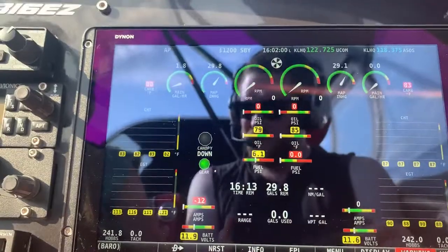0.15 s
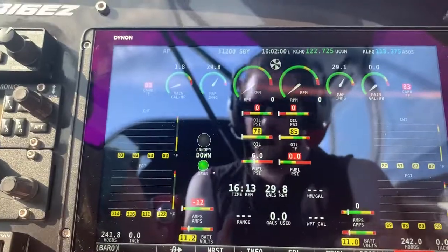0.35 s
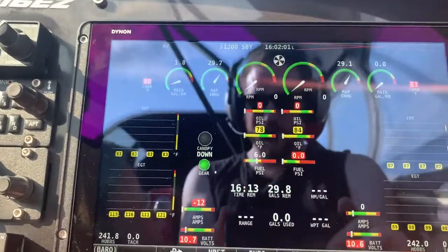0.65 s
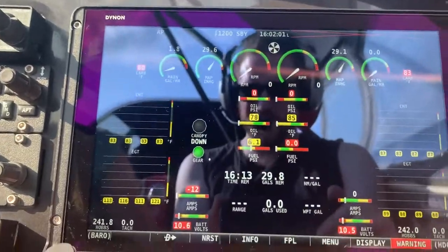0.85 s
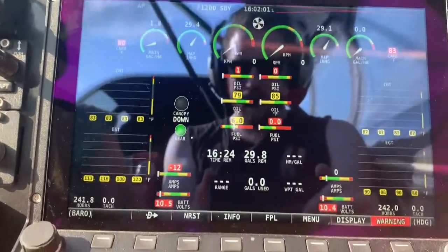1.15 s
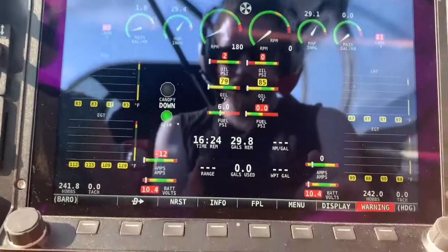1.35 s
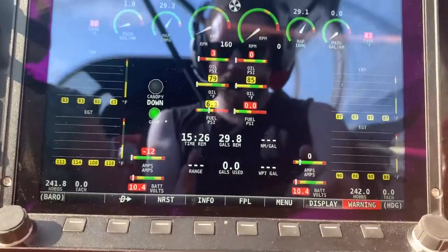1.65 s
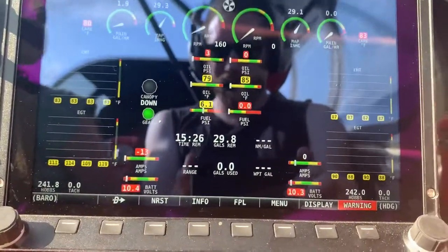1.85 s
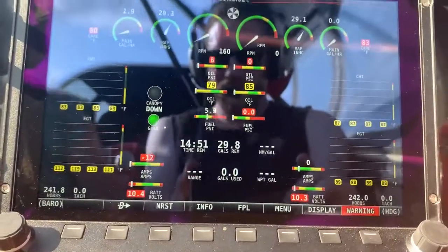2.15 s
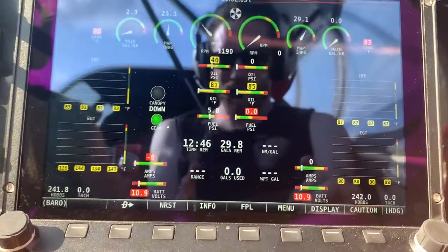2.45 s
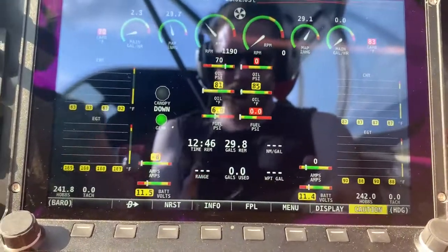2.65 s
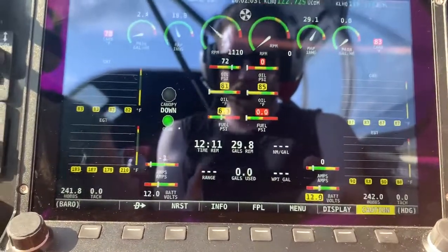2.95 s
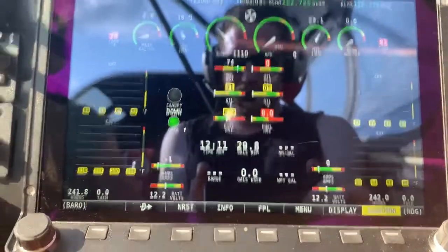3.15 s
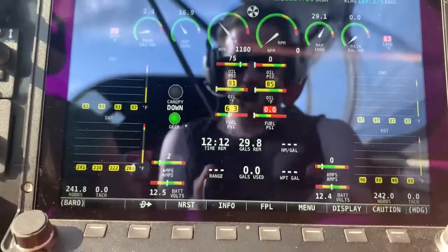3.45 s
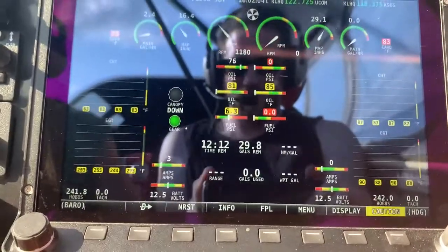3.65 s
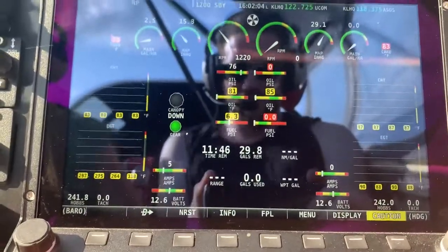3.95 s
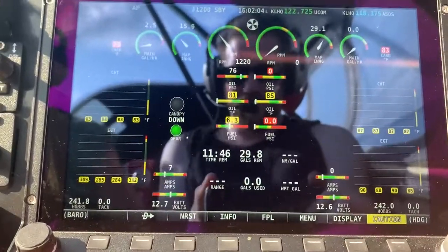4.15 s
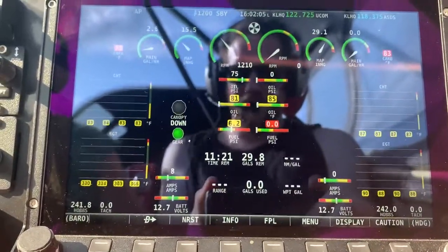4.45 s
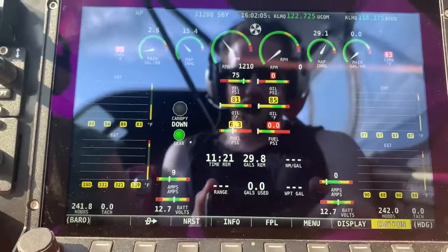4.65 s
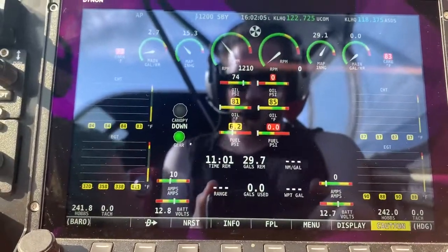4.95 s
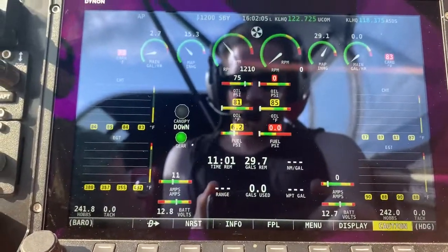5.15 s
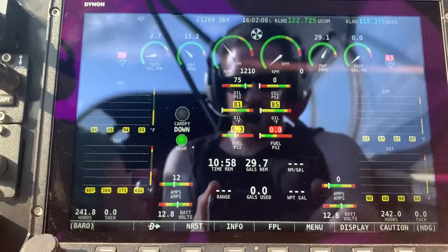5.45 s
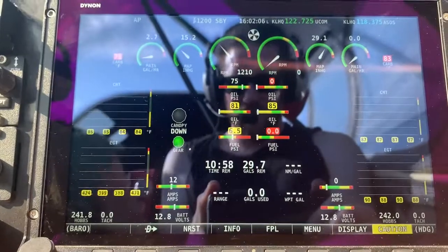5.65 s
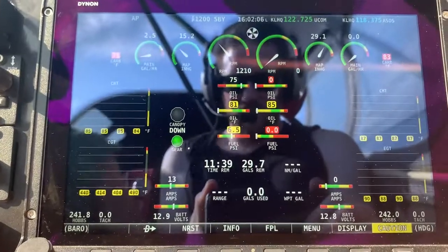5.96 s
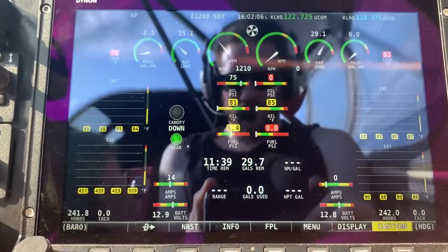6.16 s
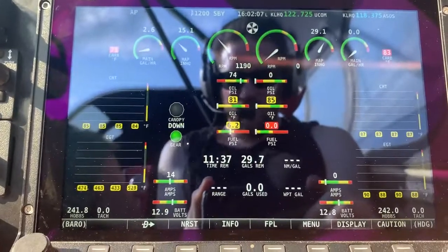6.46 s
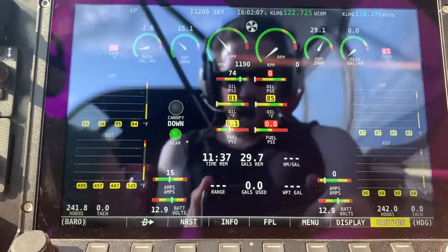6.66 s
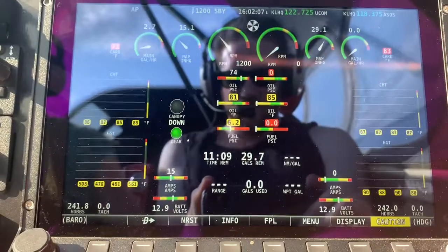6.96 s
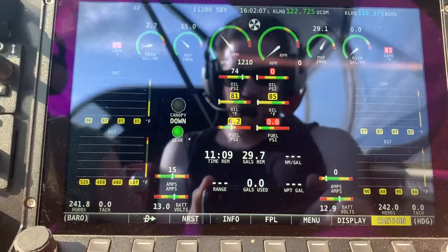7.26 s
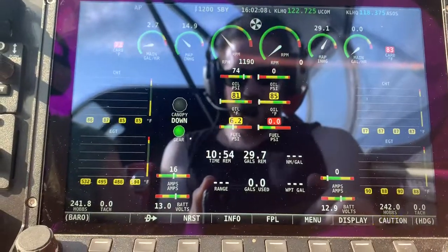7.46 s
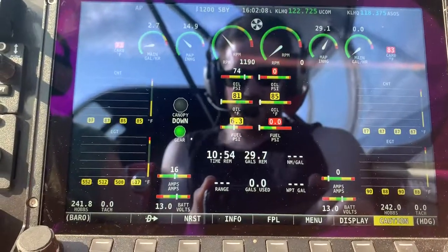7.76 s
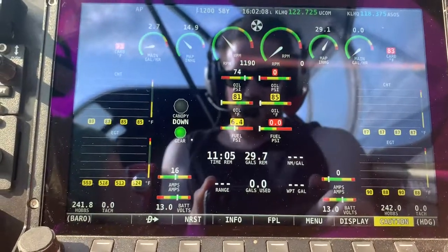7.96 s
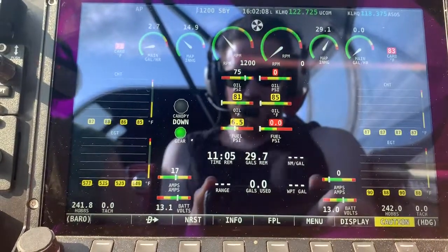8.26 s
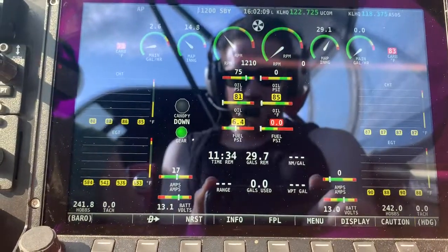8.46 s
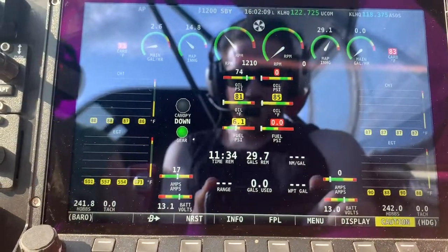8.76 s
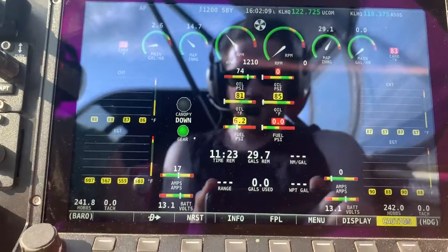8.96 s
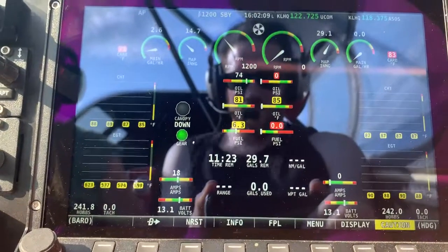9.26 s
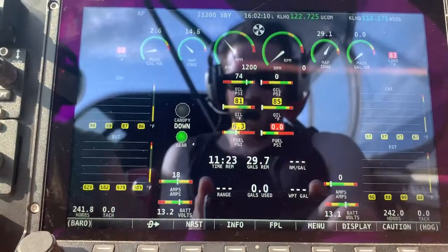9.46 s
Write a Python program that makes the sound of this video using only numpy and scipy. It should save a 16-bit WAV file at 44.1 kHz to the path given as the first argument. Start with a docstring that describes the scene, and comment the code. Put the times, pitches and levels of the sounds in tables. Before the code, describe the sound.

Close handheld stereo capture under a small plane's canopy: a pinion chirps, then eight rhythmic, low grinding heaves follow at about five per second. A sudden burst of barking exhaust and roaring air marks the start, loudest at first. It eases to a continuous throbbing idle, a deep drone under turbulent wash, with faint mechanical hiss, cowling knocks and random canopy thuds until the end.

```python
"""Cockpit of a light aircraft, a phone's two microphone ports inside under the canopy.
Eight compression strokes load the starter: airframe, mounts and panels ring, gears grind, the pinion whines.
The engine catches with rich barks and idles: a drone locked to the shaft, noise throbbing with its turns.
Propeller wash is gusty noise; heavy firings, slaps on the canopy, knocks and loose parts are single blows."""
import sys
import numpy as np
from scipy import signal
from scipy.fft import irfft, next_fast_len
from scipy.io import wavfile
from scipy.ndimage import uniform_filter1d

SR = 44100
rng = np.random.default_rng(int(sys.argv[2]) if len(sys.argv) > 2 else 0)


def master(y):
    """Save y as 16-bit WAV."""
    cut = np.clip(np.atleast_2d(y).T, -1, 1)
    pcm = np.round(cut * 32767)  # scale
    wavfile.write(sys.argv[1], SR, pcm.astype(np.int16))


N = 423801

# canopy buffet spectrum: (frequency [Hz], relative level per Hz [dB])
BUFFET_SPECTRUM = [(15, -29), (19, -18), (31, -3), (48, 7.5), (65, 3.5), (86, 3.5), (145, -7.5),
                   (260, -11.5), (340, -51), (570, -120)]
# propeller wash roar spectrum: (frequency [Hz], relative level per Hz [dB])
ROAR_SPECTRUM = [(59, -35), (100, -1), (273, -13.5), (426, -10.5), (469, -9), (605, -5), (780, -13.5),
                 (960, -8), (1140, -9.5), (1520, -15.5), (4500, -35), (5850, -65)]
# valve gear hiss spectrum: (frequency [Hz], relative level per Hz [dB])
HISS_SPECTRUM = [(2000, 11.5), (3500, 3.5), (4700, 4), (6500, 2), (9000, 3.5), (11500, -2.5), (14000, -2),
                 (16000, -22)]
# air puffed by each firing: (frequency [Hz], relative level per Hz [dB])
PUFF_SPECTRUM = [(500, -3), (1000, 9.5), (2200, 1), (4500, -6), (7000, -45), (14000, -47)]
# noise of the running engine: (time [s], buffet [dB], wash roar [dB], hiss [dB])
RUNNING_LEVELS = [(1.55, -19, -43, -68), (1.62, -16, -27, -38), (1.742, -15.5, -17, -26.5),
                  (2.075, -16, -15, -27.5), (2.125, -17, -36, -33), (2.17, -16, -17, -33.5),
                  (2.245, -17, -20, -40), (2.28, -13.5, -28, -49), (2.4, -23, -29, -41.5),
                  (2.47, -16.5, -22, -36.5), (2.68, -16.5, -25, -38), (3.3, -18.5, -21, -36),
                  (3.75, -18.5, -23, -36.5), (4.7, -16.5, -21, -36.5), (6.5, -18.5, -22, -36.5),
                  (8.7, -17, -21, -36.5), (9.61, -18, -22.5, -37.5)]
# cowling modes: (frequency [Hz], width [Hz], relative level [dB])
COWLING_MODES = [(148, 135, 1.5), (264, 250, -5), (411.5, 85, -2), (628.6, 62, -6), (922, 170, -10),
                 (1270, 1600, -11)]
# loud single blows, relative levels: heavy firings while the engine catches, then slaps on the canopy:
# (time [s], crack [dB], thump [dB], tick [dB])
LOUD_BLOWS = [(1.762, -18, -30, -24), (1.812, -16, -14, -37), (1.881, -30, -10, -36),
              (1.937, -35, -30, -34), (2.045, -23, -25, -42), (2.149, -26, -12, -43), (2.176, -27, -9, -35),
              (2.081, -28, -14, -47), (2.237, -18.5, -9.5, -34), (2.279, -24.5, -24, -38),
              (2.307, -26, -19.5, -42), (2.631, -33, -15, -48), (2.793, -30, -17.5, -47),
              (2.823, -20.5, -15.5, -48), (2.984, -30, -32, -41), (3.251, -23, -13.5, -23.5),
              (3.436, -23, -8, -41), (3.585, -30, -19, -40), (3.78, -25, -18, -40), (4.04, -21.5, -12, -41),
              (4.141, -18, -25, -48), (4.356, -20.5, -20, -34), (4.441, -22, -16, -35),
              (4.542, -22, -15, -32), (4.611, -29, -6.5, -33), (4.641, -18.5, -15, -30),
              (4.772, -20, -22, -38), (4.834, -21, -10.5, -44), (4.893, -21, -11, -48),
              (5.039, -37, -26, -50), (5.317, -42, -18, -34), (5.354, -26, -16, -44),
              (5.441, -17.5, -11.5, -27.5), (5.567, -21, -16.5, -46), (5.641, -26, -18, -46),
              (5.7475, -24, -17, -27.5), (6.006, -29, -9, -42), (6.091, -16.5, -17, -28.5),
              (6.237, -30, -15.5, -38), (6.287, -25, -20, -42), (6.389, -33, -13.5, -38),
              (6.518, -17, -8, -25), (6.6826, -22, -11, -33), (6.945, -22, -17, -30),
              (7.0726, -25, -9, -45), (7.445, -36, -14.5, -50), (7.491, -25, -22, -33),
              (7.6396, -23.5, -32, -36), (7.914, -21.5, -14, -32), (7.994, -24, -34, -36),
              (8.1846, -21.5, -11, -41), (8.369, -24, -11, -40), (8.486, -25, -24, -46),
              (8.989, -36, -13.5, -37), (9.035, -34, -23, -46), (9.128, -23, -15.5, -31),
              (9.241, -24, -12.5, -30), (9.364, -23, -14, -40), (9.415, -20.5, -17, -31)]
# noise shared by the left and right ports: (frequency [Hz], share of power [0 to 1])
PORT_LIKENESS = [(30, 0.75), (250, 0.72), (600, 0.42), (1100, 0.65), (2000, 0.083), (3500, 0.17),
                 (5000, 0.18), (7000, 0.9), (10000, 1)]
# short whines as the pinion engages: (middle [s], length [s], pitch at the middle [Hz], relative level [dB])
PINION_WHINES = [(0.082, 0.038, 1750, -40), (.1, 0.055, 840, -37.5), (.116, 0.041, 1510, -35),
                 (0.174, .06, 2010, -43), (.07, 0.037, 970, -43), (.13, .03, 1580, -41),
                 (.35, 0.025, 590, -32), (.352, 0.028, 1790, -39), (0.356, .04, 1140, -37)]
# compression strokes, relative levels at full load:
# (start [s], full load [s], end [s], airframe boom [dB], mount groan [dB], gear grind [dB], starter whirr [dB])
COMPRESSION_STROKES = [(0.058, 0.139, 0.22, -16, -21, -17.5, -34.5),
                       (0.34, 0.418, 0.53, -14.5, -14.5, -13, -32.5),
                       (0.542, 0.621, 0.71, -13.5, -11.5, -11, -32),
                       (0.749, 0.819, 0.94, -13, -16, -11, -32.5),
                       (0.941, 1.018, 1.136, -13.5, -23, -11.5, -33.5),
                       (1.133, 1.213, 1.317, -13, -9.5, -10, -31.5),
                       (1.32, 1.398, 1.49, -12, -15, -10.5, -31.5),
                       (1.517, 1.594, 1.674, -17, -14.5, -12.5, -31.5)]
# panel modes under the grind: (frequency [Hz], width [Hz], relative level [dB])
PANEL_MODES = [(114, 42, 9), (206.6, 42, 4), (513, 240, -12.5), (640, 31, -14), (753, 77, -15.5),
               (920, 72, -16)]
# starter whirr spectrum: (frequency [Hz], relative level per Hz [dB])
WHIRR_SPECTRUM = [(900, 8), (1800, 5.5), (2900, 0), (4400, -5.5), (6000, -10.5), (8000, -9), (9200, -34),
                  (10500, -10.5), (15000, -28)]
# starter housing modes: (frequency [Hz], relative level [dB])
HOUSING_MODES = [(870, 10), (1170, 4.5), (1500, -3.5), (1760, 5), (2020, -9), (2300, -1.5)]
# exhaust bark spectrum: (frequency [Hz], relative level per Hz [dB])
BARK_SPECTRUM = [(180, -38), (300, 1), (398, 4), (475, -6), (608, 0), (717, -6), (929, -1), (1260, -20),
                 (5000, -31), (6500, -67)]
# mean shaft speed: (time [s], speed [turns per s])
SHAFT_SPEED = [(1.6, 11.1), (1.75, 13), (1.85, 14.3), (1.93, 19.6), (2.08, 20.4), (2.25, 19.5), (2.5, 17.5),
               (3.3, 19.6), (9.61, 19.9)]
# mean exhaust drone: (time [s], level [dB])
DRONE_LEVEL = [(1.6, -39), (1.75, -12), (1.85, -9), (1.93, -18), (2.08, -11), (2.25, -51), (2.5, -21.5),
               (5.0, -28), (6.0, -25), (9.61, -23.5)]

# how a layer follows a stroke: attack s, build-up before full load s, release s,
# then dB under full load before it, after it and between strokes
BOOM_SHAPE, GROAN_SHAPE = (0.025, 0.03, 0.04, 1.5, 5, 14), (0.027, 0.037, 0.028, 23, 17, 28)
GRIND_SHAPE, WHIRR_SHAPE = (0.014, 0.041, 0.026, 10.3, 6.8, 16), (0.0088, 0.02, 0.046, 0.42, 3.7, 11.8)
BOOM_START_HZ, BOOM_SAG_HZ_PER_S = 70.2, 1.59
BOOM_PAN_DB = -2.3  # left minus right
HUM_DB = -23
GROAN_HZ, GROAN_WIDTH_HZ = 381.6, 79
RASP_HZ, RASP_WIDTH_HZ, SQUEAL_HZ, SQUEAL_WIDTH_HZ = 4340, 870, 9000, 1400
WHINE_SAG_PER_S = 1.1  # share of the pitch lost per second
# rich firings: first, loudest from, fade begins; level in dB, dB under it at the first firing
RICH_S, RICH_FADE_S, RICH_DB, RICH_START_DB = (1.64, 1.8, 2.2), 0.14, -19, 15
# pitch ranges of single blows
THUD_HZ, PING_HZ, SLAP_HZ, CLATTER_HZ = (54.9, 146.8), (282.5, 1490), (160, 486), (1200, 3095)
BLOW_SAG = 0.4  # extra turns at the start of a blow
PORT_LAG_S, TOP_HZ = 1 / 4680, 15350

T = np.arange(N) / SR
SIZE = next_fast_len(N)
FREQ = np.arange(SIZE // 2 + 1) * SR / SIZE + 1e-3  # kept off zero for the logarithm


def undb(db):
    """Amplitude of a level in dB."""
    return 10 ** (np.asarray(db) / 20)


def unit(x):
    """Signal scaled to rms 1."""
    return x / np.sqrt(np.mean(x ** 2))


def over_hz(points):
    """Joins (Hz, value) points on a log-frequency axis."""
    hz, value = np.transpose(points)
    return np.interp(np.log(FREQ), np.log(hz), value)


def over_time(rows, fade_s=0.046):
    """Columns of a time table with rounded corners, and a gate that fades outside it."""
    s, *columns = np.transpose(rows)
    gate = np.clip(1 + np.minimum(T - s[0], s[-1] - T) / fade_s, 0, 1)
    return [uniform_filter1d(np.interp(T, s, c), size=200) for c in columns], gate


def over_strokes(full_db, shape):
    """Level in dB over all strokes: attack, wait, build-up to full load, sag, release."""
    attack_s, build_s, release_s, before_db, after_db, between_db = shape
    start, full, end = np.transpose(COMPRESSION_STROKES)[:3]
    corners_s = [start, start + attack_s, full - build_s, full, end - release_s, end]
    under_db = [between_db, before_db, before_db, 0, after_db, between_db]
    s = np.maximum.accumulate(np.ravel(corners_s, "F"))  # corners may not run backwards
    db = np.interp(T, s, (full_db[:, None] - under_db).ravel())
    return uniform_filter1d(db, size=200)


def walk(rate):
    """Random levels held 1 / rate s and slewed twice; rms 1."""
    k = int(SR / rate)
    held = np.repeat(rng.standard_normal(N // k + 1), k)
    return unit(uniform_filter1d(uniform_filter1d(held, k), k)[:N])


def colour(points):
    """Gain of a dB spectrum, silent outside its ends."""
    return undb(over_hz(points)) * (FREQ > points[0][0]) * (FREQ < points[-1][0])


def mode(hz, width_hz):
    """Gain of a steep resonance."""
    return 1 / (1 + ((FREQ - hz * hz / FREQ) / width_hz) ** 2)


def modes(table):
    """Gain of a set of resonances."""
    return sum(undb(db) * mode(hz, width_hz) for hz, width_hz, db in table)


def air(gain):
    """Two-port noise of a given spectrum; low sound reaches the left port first, treble the right."""
    like = np.clip(over_hz(PORT_LIKENESS), 0, 1)
    shared, left, right = rng.standard_normal((3, len(FREQ), 2)) @ [1, 1j]
    turn = np.exp(1j * np.pi * FREQ * PORT_LAG_S * np.where(FREQ < 3500, 1, -1))
    pair = np.sqrt(like) * shared * [turn, 1 / turn] + np.sqrt(1 - like) * np.array([left, right])
    return unit(irfft(pair * gain, SIZE)[:, :N])


def turbulent(points, common_db, own_db, rate, count):
    """Noise split into bands that follow a common swell and flicker alone; rms 1."""
    gain, out = colour(points), 0
    span = np.log(points[-1][0] / points[0][0])
    place = np.log(FREQ / points[0][0]) / span * (count - 1)
    for k in range(count):
        band = gain * np.sqrt(np.clip(1 - abs(place - k), 0, 1))
        flicker_db = own_db * (walk(rate) + 1.67 * walk(3 * rate))
        strength = np.sqrt(np.sum(band ** 2))  # air() levels every band, so its share is restored
        out = out + strength * air(band) * undb(common_db + flicker_db)
    return unit(out)


def bursts(times, db, rise_s, fall_s):
    """Envelope of short bursts that rise fast and die away."""
    kicks = np.zeros(N)
    kicks[(np.asarray(times) * SR).astype(int)] = undb(db)
    t = T[:SR // 4]
    shape = (1 - np.exp(-t / rise_s)) * np.exp(-t / fall_s)
    return signal.fftconvolve(kicks, shape / shape.max())[:N]


def rattle(times, spread_db, rise_s, fall_s):
    """Burst envelope of blows of uneven strength; rms 1."""
    return unit(bursts(times, spread_db * rng.standard_normal(len(times)), rise_s, fall_s))


def thuds(times, db, range_hz, cycles, wide):
    """Blows as dying, sagging tones of their own pitch; higher ones weaker, the right port late."""
    chance = rng.uniform(-1, 1, (len(times), 4))
    hz = range_hz[0] * (range_hz[1] / range_hz[0]) ** ((1 + chance[:, 0]) / 2)
    out = np.zeros((2, N + SR))
    for s, gain, f, (sign, *side) in zip(times, undb(db), hz, chance[:, 1:]):
        t = T[:int(2 * np.pi * cycles * SR / f)]
        turns = f * t + BLOW_SAG * (1 - np.exp(-f * t))
        envelope = np.exp(-f * t / cycles) * np.minimum(f * t / (0.27 * cycles), 1)
        tone = np.sin(2 * np.pi * turns) * envelope * np.sqrt(range_hz[0] / f)
        ports = np.sign(sign) + wide * np.array(side)
        out[:, int(s * SR):][:, :len(t)] += gain * np.outer(ports, tone)
    return np.array([out[0], np.roll(out[1], int(PORT_LAG_S * SR))])[:, :N]


def scattered(count, spread_db, range_hz, cycles, wide):
    """Tonal blows of uneven strength at random moments; rms 1."""
    times = rng.uniform(0, T[-1], count)
    return unit(thuds(times, spread_db * rng.standard_normal(count), range_hz, cycles, wide))


def singing(table):
    """The modes of a table as wandering tones that come and go; rms 1."""
    out = 0
    for hz, _, db in table:
        phase = 2 * np.pi * np.cumsum(hz * (1 + 0.022 * walk(9.7))) / SR
        out = out + undb(db + 2.8 * walk(25.24)) * np.sin(phase)
    return unit(out)


def firings(angle):
    """Times of the firings, two a turn, each a little early or late."""
    s = T[1:][np.diff(angle // np.pi) > 0]
    return np.clip(s + 0.002745 * rng.standard_normal(len(s)), 0, T[-1])


def cowling_knocks(times, spread_db):
    """Blows ring the cowling; each one stirs its modes in other shares at each port; rms 1."""
    at, out = (times * SR).astype(int), 0
    blow = undb(spread_db * rng.standard_normal((len(at), 1)))
    for hz, width_hz, db in COWLING_MODES:
        kicks = np.zeros((2, N))
        share = rng.standard_normal((len(at), 3))
        # higher modes differ more between the ports
        kicks[:, at] = (blow * (share[:, :1] + min(hz / 700, 1.5) * share[:, 1:])).T
        ring = signal.iirpeak(hz, hz / width_hz, SR)  # applied twice: a padded blow has no sharp edge
        out = out + undb(db) * unit(signal.lfilter(*ring, signal.lfilter(*ring, kicks)))
    return unit(out)


def canopy_buffet(gust, fired):
    """Low turbulent noise of wash shaking the canopy, with a dull thud at each firing."""
    noise = turbulent(BUFFET_SPECTRUM, 0.5 * gust, 0.59, 10, count=3)
    thud = thuds(fired, 2.75 * rng.standard_normal(len(fired)), THUD_HZ, cycles=1.42, wide=0.54)
    return 1.09 * noise + 0.66 * unit(thud)


def wash_roar(gust, fired, angle):
    """Wash noise swells with gusts and shaft; firings knock the cowling and loose parts rattle at random."""
    beat_db = 0.16 * np.cos(2 * angle) + 0.68 * np.cos(angle)
    roar = turbulent(ROAR_SPECTRUM, 0.86 * gust + beat_db, 1.36, 18, count=7)
    knock = cowling_knocks(fired, 3.3) + 0.53 * cowling_knocks(rng.uniform(0, T[-1], 900), 3.3)
    puff = rattle(fired, 3.2, rise_s=0.006, fall_s=0.012) * air(colour(PUFF_SPECTRUM))
    ping = scattered(1200, 2.66, PING_HZ, cycles=4.9, wide=1.0)
    clatter = scattered(2000, 2.7, CLATTER_HZ, cycles=11.6, wide=0.9)
    slap = scattered(500, 3.3, SLAP_HZ, cycles=2.2, wide=0.49)
    gusty = 0.16 * clatter * undb(1.1 * gust) + 0.57 * knock * undb(0.71 * gust)
    return 0.7 * roar + 0.4 * slap + gusty + 0.2 * puff + 0.6 * ping


def valve_hiss(gust, angle):
    """Treble noise of the valve gear, swelling once and twice a turn and with the gusts."""
    beat_db = 0.54 * np.cos(angle) + 0.63 * np.cos(2 * angle + 0.97)
    return turbulent(HISS_SPECTRUM, 0.5 * gust + beat_db, 0.74, 25, count=4)


def wash(angle):
    """Propeller wash and engine noise share one gust; blades and valves leave their beat on it."""
    (buffet_db, roar_db, hiss_db), gate = over_time(RUNNING_LEVELS, fade_s=0.12)
    gust = walk(14) + 0.27 * walk(45)
    fired = firings(angle)
    buffet = undb(buffet_db) * canopy_buffet(gust, fired)
    roar = undb(roar_db) * wash_roar(gust, fired, angle)
    return gate * (buffet + roar + undb(hiss_db) * valve_hiss(gust, angle))


def loud_blows():
    """Heavy firings and strong gusts thump, crack and tick: noise bursts over dying tones."""
    s, crack_db, thump_db, tick_db = np.transpose(LOUD_BLOWS)
    crack = bursts(s, crack_db, rise_s=0.00061, fall_s=0.016) * air(mode(1140, 1130))
    tick = bursts(s, tick_db, rise_s=0.0062, fall_s=0.015) * air(mode(2400, 2100))
    thump = 0.76 * bursts(s, thump_db, rise_s=0.0026, fall_s=0.017) * air(mode(180, 500))
    low_blow = 2.0 * thuds(s, thump_db, SLAP_HZ, cycles=1.48, wide=0.3)
    high_blow = 1.7 * thuds(s, crack_db, PING_HZ, cycles=2.1, wide=1.5)
    return crack + tick + thump + low_blow + high_blow


def pinion_whines():
    """Brief, rough, slightly falling tones from the meshing pinion."""
    out = 0
    for middle_s, length_s, hz, db in PINION_WHINES:
        t = T - middle_s
        swell = np.exp(-(2 * t / length_s) ** 2)
        tone = np.sin(2 * np.pi * hz * t * (1 - WHINE_SAG_PER_S / 2 * t))
        out = out + undb(db) * np.sqrt(2) * swell * tone
    return undb(2.6 * walk(90)) * out


def airframe_boom():
    """The airframe booms as a wavering, sagging low tone with some breath, louder at the right port."""
    hz = (BOOM_START_HZ - BOOM_SAG_HZ_PER_S * T) * (1 + 0.0049 * walk(4.5))
    boom = np.sqrt(2) * np.sin(2 * np.pi * np.cumsum(hz) / SR) + 0.3 * air(mode(58.5, 43))
    return boom * undb(BOOM_PAN_DB * np.array([[0.5], [-0.5]]))


def mount_groan():
    """The mounts sing a wavering tone inside a breathy resonance, and the panels sing along."""
    tone = np.sin(2 * np.pi * np.cumsum(GROAN_HZ * (1 + 0.0118 * walk(22))) / SR)
    return tone + 0.53 * air(mode(GROAN_HZ, GROAN_WIDTH_HZ)) + 0.44 * singing(PANEL_MODES[1:])


def gear_grind():
    """Grinding noise rings the panel modes while gear teeth clack at random."""
    panels = air(modes(PANEL_MODES) + undb(-13.0) * mode(330, 380))
    return 0.89 * panels + 0.3 * scattered(900, 2.9, (300, 1000), cycles=11.0, wide=1.0)


def housing():
    """Narrow modes of the starter housing that sound in broken snatches; rms 1."""
    return unit(sum(undb(db + 4.4 * walk(22.38)) * air(mode(hz, 140)) for hz, db in HOUSING_MODES))


def starter_whirr():
    """Whirring noise with a rasp, housing resonances and random metal clatter."""
    noise = air(colour(WHIRR_SPECTRUM)) + 0.35 * air(mode(RASP_HZ, RASP_WIDTH_HZ))
    return noise + 1.02 * housing() + 0.54 * scattered(1000, 2.6, CLATTER_HZ, cycles=21.0, wide=0.6)


def starter():
    """Each compression loads the starter: airframe booms, mounts groan, gear teeth grind and whirr."""
    shapes = BOOM_SHAPE, GROAN_SHAPE, GRIND_SHAPE, WHIRR_SHAPE
    full_levels = np.transpose(COMPRESSION_STROKES)[3:]
    boom_db, groan_db, grind_db, whirr_db = map(over_strokes, full_levels, shapes)
    gate = np.clip(1 + (COMPRESSION_STROKES[-1][2] - T) / 0.041, 0, 1)
    # a hum on the boom's tone, weaker from the second full load on
    hum = undb(HUM_DB) * np.clip(T / 0.2, 0, 1) * np.where(T < COMPRESSION_STROKES[1][1], 1, 0.45)
    low = (undb(boom_db) + hum) * airframe_boom() + undb(groan_db) * mount_groan()
    # the pinion squeals, loudest under full load
    squeal = undb(grind_db - 31.0) * air(mode(SQUEAL_HZ, SQUEAL_WIDTH_HZ))
    # worn teeth strike unevenly and shake grind and whirr together
    teeth = 0.83 + 0.32 * rattle(rng.uniform(0, T[-1], 900), 0.92, rise_s=0.0017, fall_s=0.0056)
    gears = undb(grind_db) * gear_grind() + undb(whirr_db) * starter_whirr()
    return gate * (low + squeal + teeth * gears)


def rich_firings(angle):
    """The first rich firings bark through the exhaust and knock the cowling."""
    first, loud, last = RICH_S
    db = RICH_DB - RICH_START_DB * np.clip((loud - T) / (loud - first), 0, 1)
    gate = (T > first) * np.clip(1 + (last - T) / RICH_FADE_S, 0, 1) ** 2
    beat = 0.5 + 0.56 * rattle(firings(angle), 3.3, rise_s=0.0018, fall_s=0.021)
    bark = beat * air(colour(BARK_SPECTRUM))
    return gate * undb(db) * (bark + 0.65 * cowling_knocks(firings(angle), 2.5))


def engine():
    """Exhaust drone at four cycles a turn, and the shaft angle that times the two firings a turn."""
    (turns,), gate = over_time(SHAFT_SPEED)
    drone_db = np.interp(T, *np.transpose(DRONE_LEVEL)) + 2.0 * walk(9)
    angle = 2 * np.pi * np.cumsum(turns * (1 + 0.00565 * walk(6))) / SR
    drone = np.sqrt(2) * undb(drone_db) * np.sin(4 * angle)
    return gate * drone, angle


def scene():
    """Wash and loud blows around the cockpit, then starter and engine."""
    drone, angle = engine()
    return wash(angle) + loud_blows() + pinion_whines() + starter() + rich_firings(angle) + drone


def record(dry):
    """The phone drops the deepest bass, rounds the loudest peaks and cuts the top."""
    thin = signal.sosfilt(signal.butter(2, 39, "high", fs=SR, output="sos"), dry)
    rounded = np.tanh(1.154 * thin)
    return signal.sosfilt(signal.ellip(10, 0.2, 80, TOP_HZ, fs=SR, output="sos"), rounded)


dry = scene()
out = record(dry)
master(out)
```